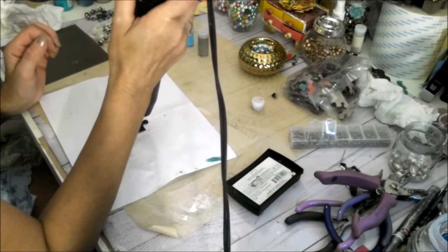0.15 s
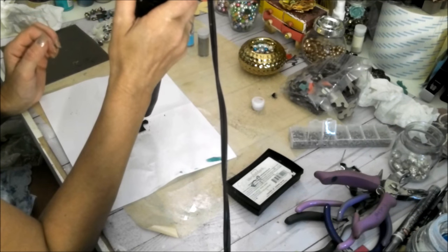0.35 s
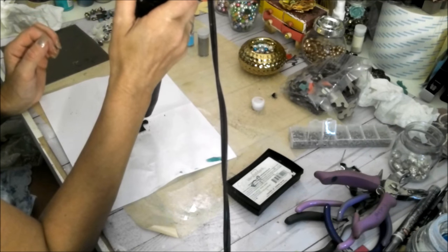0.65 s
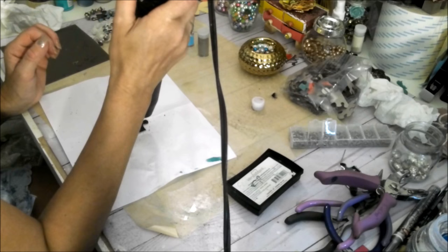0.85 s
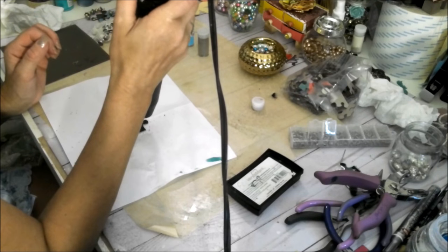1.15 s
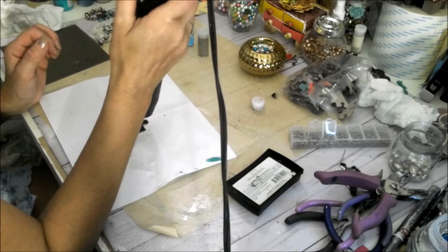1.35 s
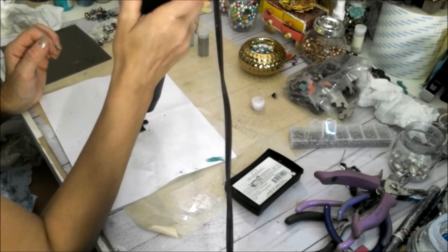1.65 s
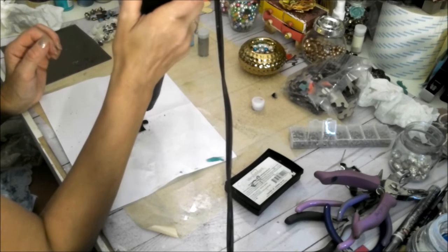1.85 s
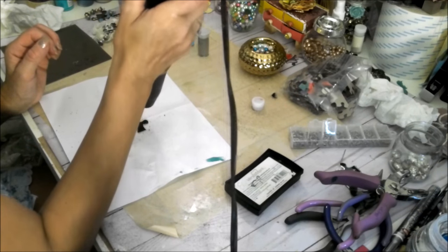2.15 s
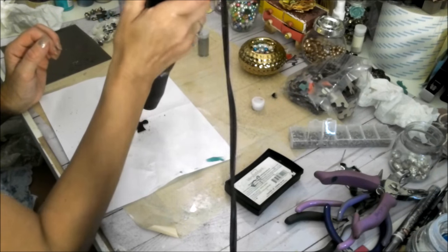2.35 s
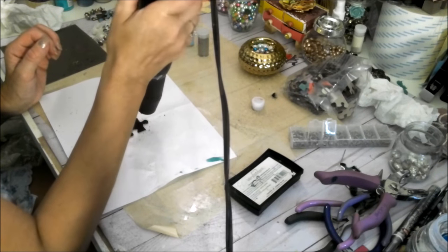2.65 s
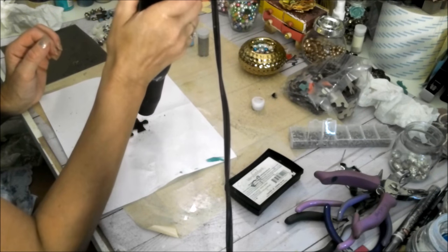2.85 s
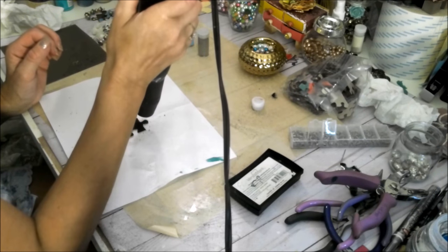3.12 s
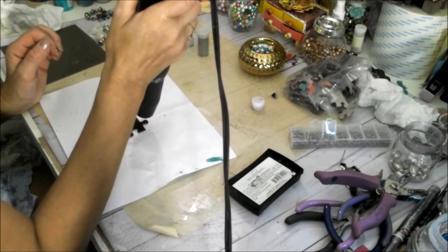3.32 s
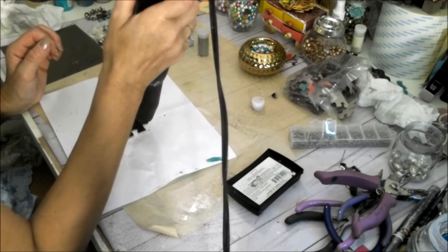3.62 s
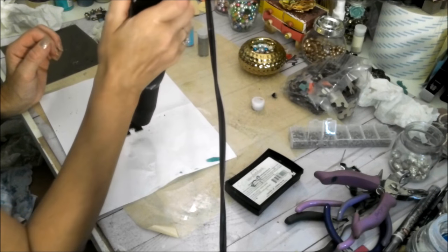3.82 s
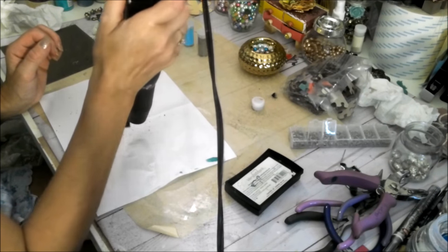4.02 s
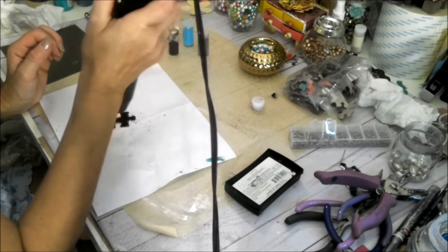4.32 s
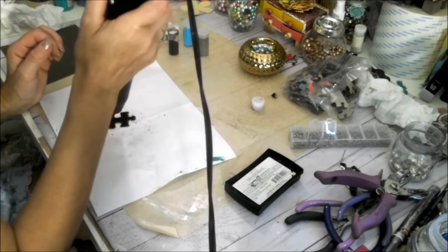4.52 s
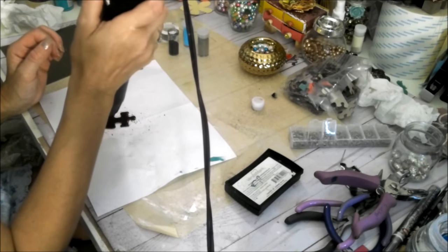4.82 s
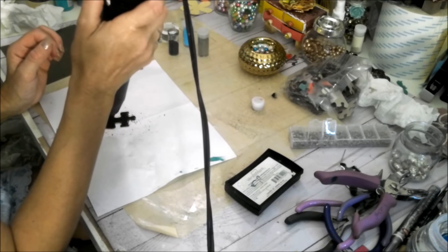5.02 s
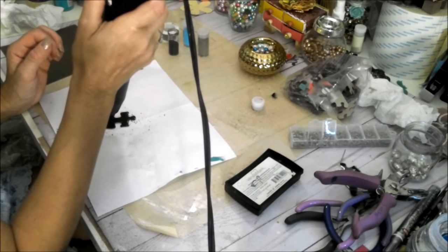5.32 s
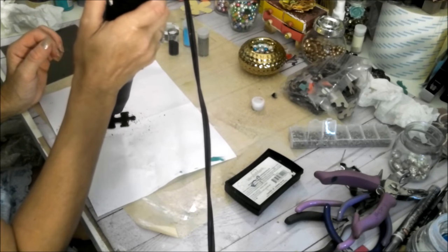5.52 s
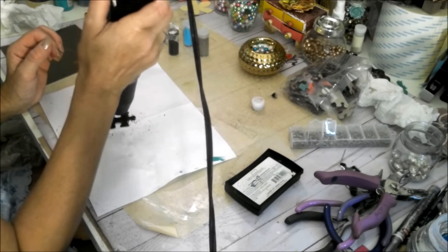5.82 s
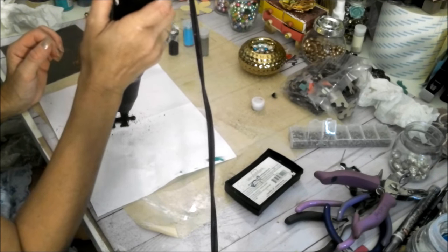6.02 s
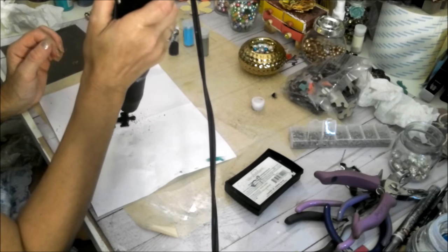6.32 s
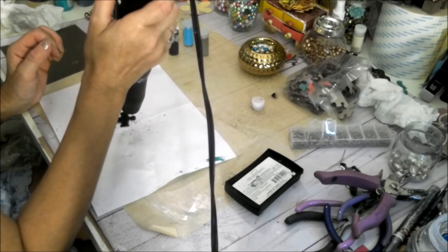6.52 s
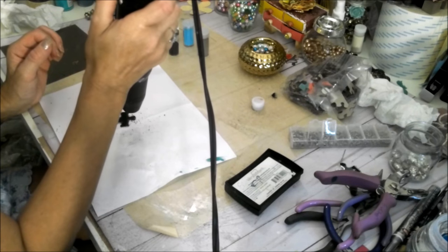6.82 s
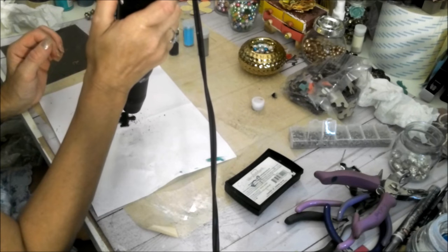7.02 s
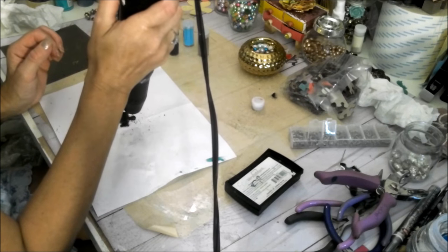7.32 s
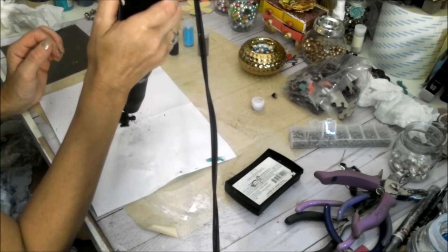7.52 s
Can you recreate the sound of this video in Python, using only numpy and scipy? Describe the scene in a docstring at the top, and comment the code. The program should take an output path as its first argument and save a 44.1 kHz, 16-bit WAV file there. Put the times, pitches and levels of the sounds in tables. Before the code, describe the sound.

From 0 s a heat gun is already at full power, held over a cluttered craft table in a small room and heard from close by. A dense, hollow rush of air, strongest in the middle range around 600 Hz, carries a bright, smooth hiss. Within it sits a thin electric motor whine that sinks very slightly in pitch over the first few seconds, then holds. Higher motor tones stand out around 0.2-0.9 s, again from 1.3 to 2.4 s, and through 2.5-4.2 s, each rising and fading softly. The roar changes colour subtly as the hand moves, fuller on its upper side near 1.7 and 3.1 s, duller around 4.8 s. From about 5 s whining overtones return and linger. Short reflections shimmer in the hiss, and a mains hum is barely present. The blowing continues unbroken to the end at about 7.7 s.

```python
"""Heat gun over a craft table

A hand-held heat gun runs steadily in a small room. Shaped noise gives the turbulent roar and hiss
of barrel and housing; delayed treble gives the echoes of table, clutter and walls. Sines on
multiples of the rotation rate give the motor whine, which slows a little while single tones swell
and fade as the hand moves the gun. One faint sine is the mains hum."""
import sys
import numpy as np
from scipy import signal
from scipy.fft import rfft, irfft, next_fast_len
from scipy.io import wavfile
from scipy.ndimage import map_coordinates

SR = 44100
rng = np.random.default_rng(int(sys.argv[2]) if len(sys.argv) > 2 else 0)


def dump(signal):
    """Clip the signal to [-1, 1] and save it as 16-bit WAV at the path in sys.argv[1]."""
    limited = np.clip(np.atleast_2d(signal).T, -1, 1)
    pcm = np.round(limited * 32767).astype(np.int16)
    wavfile.write(sys.argv[1], SR, pcm)


N = 337806
TIME_S = np.arange(N) / SR

# Motor tones at rest. Each row: multiple of the rotation rate, level in dB before the motor trim.
MOTOR_ORDERS = [(1, -57.5), (2, -47.5), (4, -59.5), (6, -68), (7, -50.5), (8, -58), (9, -68), (10, -80),
                (11, -57.5), (12, -73), (13, -57), (16, -62), (18, -61), (20, -67), (23, -76), (24, -71),
                (27, -64), (30, -69), (32, -81), (34, -84), (35, -75), (39, -83), (47, -84), (48, -76),
                (52, -85)]
# Tones swelling while the gun's aim favours them. Each row: start in seconds, end in seconds,
# multiple of the rotation rate, level in dB before the motor trim.
TONE_SWELLS = [(0.0, 0.15, 48, -75), (0.0, 0.5, 30, -61), (0.1, 0.7, 16, -55), (0.18, 0.4, 27, -64),
               (0.2, 0.48, 9, -48.5), (0.2, 0.8, 20, -53), (0.3, 0.9, 11, -52), (0.3, 0.9, 47, -73),
               (0.45, 0.8, 12, -52), (1.25, 1.4, 9, -56), (1.3, 2.35, 20, -52), (1.4, 2.04, 8, -50.5),
               (1.5, 2.127, 13, -51.5), (1.55, 2.4, 48, -69), (1.6, 2, 10, -61), (1.8, 2.2, 30, -66),
               (2.2, 3.6, 6, -56.5), (2.3, 4.7, 9, -55.5), (2.55, 4.2, 11, -51), (2.55, 3.4, 30, -62.5),
               (2.8, 3.6, 34, -71), (3.05, 3.35, 9, -50.5), (3.3, 4.2, 48, -69), (3.5, 3.8, 27, -69),
               (3.55, 4.15, 30, -60.5), (4.4, 5.2, 27, -63), (4.4, 5.6, 30, -64), (4.4, 7.3, 20, -59),
               (4.9, 7.66, 9, -49.5), (5.35, 6.1, 20, -54.5), (5.8, 7.4, 11, -54.5), (5.9, 7.66, 48, -72),
               (6.2, 7.66, 8, -52.5), (6.7, 7.4, 32, -67), (7.05, 7.66, 30, -62)]
# Roar level, wavering slightly and slowly. Each row: time in seconds, level in dB before the air trim.
ROAR_LEVEL = [(0, -25.5), (1.6, -25.5), (2.3, -26.5), (3.1, -26), (4.0, -25.5), (4.6, -26.5), (5.7, -25.5),
              (6.4, -25), (7.66, -26)]
# Turbulence before the resonances. Each row: frequency in Hz, relative spectrum level in dB.
TURBULENCE_SLOPE = [(20, -19.5), (60, -17.5), (120, -14.5), (260, -9), (330, -3.5), (470, -4), (620, -4),
                    (1020, -4), (2100, -4.5), (2900, -13), (6400, -14.5), (7100, -22.5), (12000, -29),
                    (15300, -34)]
# Resonances of barrel, housing and surrounding space. Each row: centre in Hz, width in Hz, lift in dB.
AIR_RESONANCES = [(362.4, 51, 10), (420.7, 44, 7), (500, 26, 12), (519.3, 12.2, 12), (553.2, 25.3, 11),
                  (572, 39.4, 13.5), (617, 60.2, 23), (665.3, 41.1, 15), (687.3, 14.8, 9.5),
                  (727.8, 45, 20), (790, 26, 9.5), (861.8, 55.5, 11), (914.6, 102, 7.5), (1282, 37, 8.5),
                  (1326, 19, 5), (1452, 8.3, 5.5), (1506, 17, 6.5), (1614, 20, 5.5), (1758, 72, 10.5),
                  (1858, 140, 7.5), (2144, 46, 3.5), (2435, 37, 3.5), (2910, 50, 4.5), (3430, 60, 4.5),
                  (3503, 346, 8.5), (3560, 37, 3), (3717, 210, 6.5), (4672, 440, 8.5), (4650, 21, 5.5),
                  (4720, 40, 3.5), (5370, 140, 3), (5820, 89, 7.5), (6620, 64, 5), (7930, 510, 4.5),
                  (8590, 630, 9), (9200, 150, 6), (10090, 280, 8), (11200, 250, 4), (13500, 900, 6.5)]
# Hollows where reflections cancel the direct roar. Each row: centre in Hz, width in Hz, cut in dB
# (negative).
REFLECTION_HOLLOWS = [(539, 14, -5), (652, 4.6, -2), (716.6, 13.5, -10), (840, 10, -3)]
# Flanks of the roar as the gun moves. Each row: time in seconds, lower flank in dB, upper flank in dB.
ROAR_FLANKS = [(0, 1, -0.5), (1, 0, 1), (1.7, 1, 4.5), (2.3, -2, -2), (3.1, 2, 4.5), (4.1, 1.5, 0),
               (4.8, 2.5, -5), (5.7, -6, -2), (6.5, -1.5, 3.5), (7.66, 3.5, -2)]
# Highest hiss, beamed, so it dulls as the gun turns. Each row: time in seconds, level in dB.
TOP_HISS_LEVEL = [(0, -2), (2.2, 0), (2.7, -2), (5.5, -0.5), (7.66, -3)]

MAINS_HZ, MAINS_DB = 60.4, -75
SETTLED_HZ, START_EXCESS_HZ, SETTLE_S = 283.75, 5.9, 1.65  # rotation rate, time constant
SWELL_FADE_DB_PER_S = 29
LOWER_FLANK_HZ, UPPER_FLANK_HZ, FLANK_WIDTH_HZ = 546, 679, 35
TOP_HISS_HZ, CUTOFF_HZ = 9500, 15700
DRIFT_STEP = 40  # samples between drift points


def from_db(db):
    """Decibels to gain."""
    return 10 ** (np.asarray(db) / 20)


def rms_one(x):
    """Scale to unit rms."""
    return x / np.sqrt(np.mean(x ** 2) + 1e-20)


def in_time(rows):
    """Interpolate each column of a curve table at every sample."""
    points_s, *columns = np.transpose(rows)
    return [np.interp(TIME_S, points_s, column) for column in columns]


def drift(rate_hz):
    """Random wander of unit rms: noise through two equal poles at rate_hz."""
    pole = np.exp(-2 * np.pi * rate_hz * DRIFT_STEP / SR)
    noise = rng.standard_normal(N // DRIFT_STEP + 2002)
    slow = signal.lfilter([1], [1, -2 * pole, pole ** 2], noise)[2000:]  # drop the run-in
    return np.interp(np.arange(N) / DRIFT_STEP, np.arange(len(slow)), rms_one(slow))


def mains_hum():
    """Faint steady sine at the mains frequency."""
    return np.sqrt(2) * from_db(MAINS_DB) * np.sin(2 * np.pi * MAINS_HZ * TIME_S)


def tone_level_db(order, rest_db):
    """Level of one motor tone: rises from rest into each swell, holds and sinks back."""
    db = np.full(N, rest_db, float)
    for start_s, end_s, multiple, swell_db in TONE_SWELLS:
        if round(multiple) == order:
            outside_s = np.abs(TIME_S - np.clip(TIME_S, start_s, end_s))
            db = np.maximum(db, swell_db - SWELL_FADE_DB_PER_S * outside_s)
    return db


def motor_whine(trim_db, speed_jitter, shimmer_db, waver_db_at_order_10):
    """Tones on multiples of the rotation rate; the speed trembles, so high orders are blurred."""
    speed_hz = SETTLED_HZ + START_EXCESS_HZ * np.exp(-TIME_S / SETTLE_S)
    trembling_hz = speed_hz * (1 + speed_jitter * drift(14.6))
    angle_rad = 2 * np.pi * np.cumsum(trembling_hz) / SR
    whine = np.zeros(N)
    for multiple, rest_db in MOTOR_ORDERS:
        order = round(multiple)
        db = tone_level_db(order, rest_db) + trim_db
        # shorter waves waver more with small moves of the hand
        db = db + waver_db_at_order_10 * np.sqrt(order / 10) * drift(0.91)
        db = db + shimmer_db * drift(27)
        phase_rad = 2 * np.pi * rng.random()
        whine += from_db(db) * np.sin(order * angle_rad + phase_rad)
    return np.sqrt(2) * whine  # levels are rms


def reflections(air, echo_db, sway_s, above_hz, count=14):
    """Table, clutter and walls echo the treble; the paths sway with the hand and comb the hiss."""
    highpass = signal.butter(2, above_hz, "high", fs=SR, output="sos")
    treble = signal.sosfilt(highpass, air)
    hand_s = sway_s * drift(0.21)
    echoes = np.zeros(N)
    # lean: how far, and which way, the hand changes this path; its sign is also the polarity
    for delay_s, lean in rng.uniform([.004, -1], [.035, 1], (count, 2)):
        read_at = np.arange(N) - SR * (delay_s + lean * hand_s)
        echoes += np.sign(lean) * map_coordinates(treble, [read_at], order=3, mode="wrap")
    return from_db(echo_db) * echoes / np.sqrt(count)


def air_colour(hz):
    """Gain of the air path: turbulence slope, lifted at resonances and cut at hollows."""
    points_hz, points_db = np.transpose(TURBULENCE_SLOPE)
    db = np.interp(np.log(hz + 1), np.log(points_hz), points_db)
    for centre_hz, width_hz, lift_db in AIR_RESONANCES + REFLECTION_HOLLOWS:
        db = db + lift_db / (1 + (2 * (hz - centre_hz) / width_hz) ** 2)
    return from_db(db)


def airflow(trim_db, flutter_db):
    """Turbulent air: coloured noise, a hollow roar near 600 Hz under a bright hiss."""
    size = next_fast_len(N)
    hz = np.arange(size // 2 + 1) * SR / size
    spectrum = rfft(rng.standard_normal(size)) * air_colour(hz)
    noise = rms_one(irfft(spectrum, size)[:N])
    level_db, = in_time(ROAR_LEVEL)
    mean_db = level_db.mean()
    waver_db = level_db - mean_db
    roar = signal.sosfiltfilt(signal.butter(2, 1000, fs=SR, output="sos"), noise)
    hiss = noise - roar
    # the roar follows the waver fully, the hiss hardly at all
    air = roar * from_db(waver_db) + hiss * from_db(0.033 * waver_db)
    return air * from_db(mean_db + trim_db + flutter_db * drift(1.2))


def shifting_flanks(air):
    """Two peak filters: the gun's position favours now the lower, now the upper side of the roar."""
    out = air
    for centre_hz, db in zip((LOWER_FLANK_HZ, UPPER_FLANK_HZ), in_time(ROAR_FLANKS)):
        b, a = signal.iirpeak(centre_hz, centre_hz / FLANK_WIDTH_HZ, fs=SR)
        out = out + (from_db(db) - 1) * signal.lfilter(b, a, air)
    return out


def dulling_hiss(air):
    """Treble shelf that follows the gun's aim."""
    highpass = signal.butter(2, TOP_HISS_HZ, "high", fs=SR, output="sos")
    top = signal.sosfiltfilt(highpass, air)
    db, = in_time(TOP_HISS_LEVEL)
    return air + (from_db(db) - 1) * top


def scene():
    """Sum of the air with its echoes, the motor whine and the mains hum."""
    air = airflow(trim_db=-1.01, flutter_db=-0.01)
    air = dulling_hiss(shifting_flanks(air))
    air = air + reflections(air, echo_db=-5.5, sway_s=.00014, above_hz=1040)
    whine = motor_whine(trim_db=-0.95, speed_jitter=0.00018, shimmer_db=1.3, waver_db_at_order_10=0.35)
    return (air + whine + mains_hum())[None]


def record(dry):
    """Steep elliptic low-pass at CUTOFF_HZ."""
    lowpass = signal.ellip(12, .1, 90, CUTOFF_HZ, fs=SR, output="sos")
    return signal.sosfilt(lowpass, dry)


dry = scene()
out = record(dry)
dump(out)
```